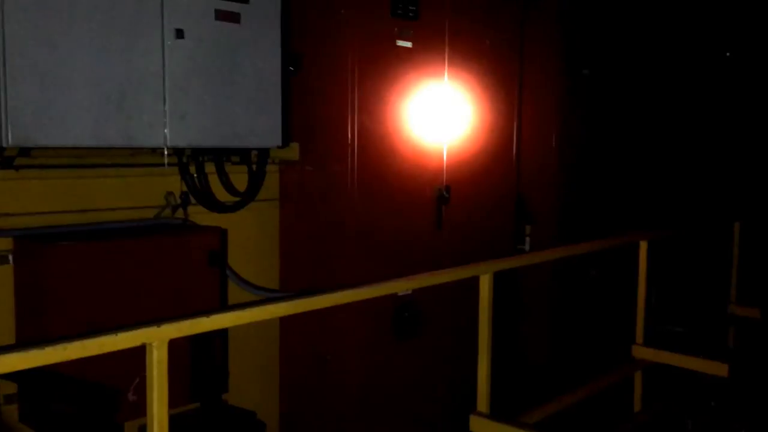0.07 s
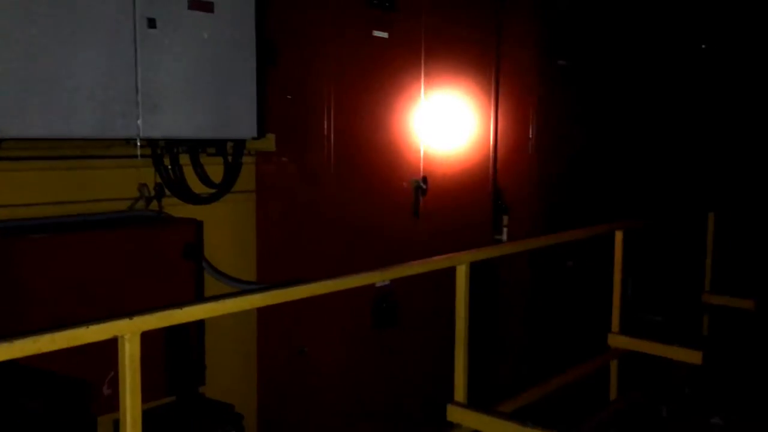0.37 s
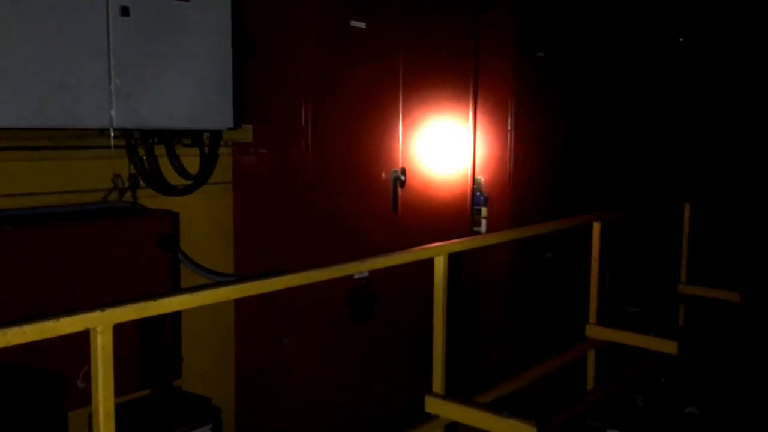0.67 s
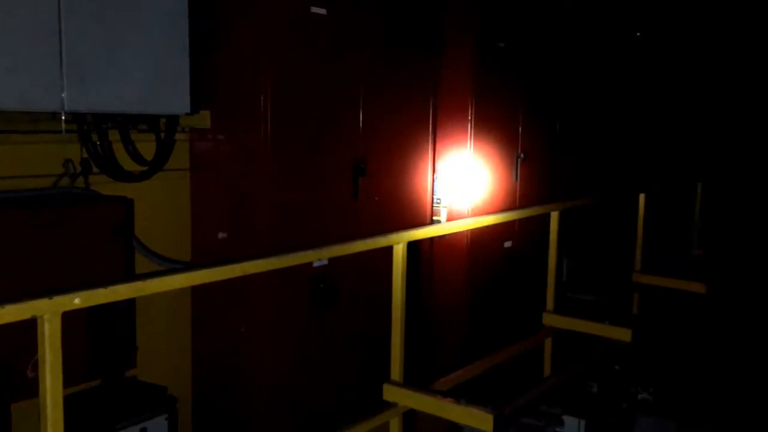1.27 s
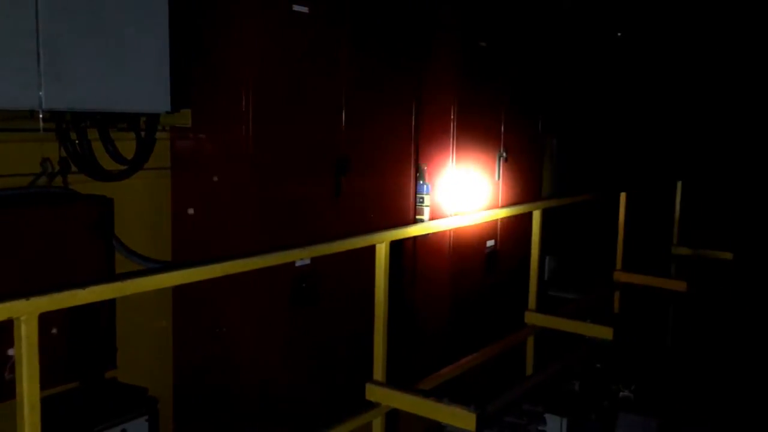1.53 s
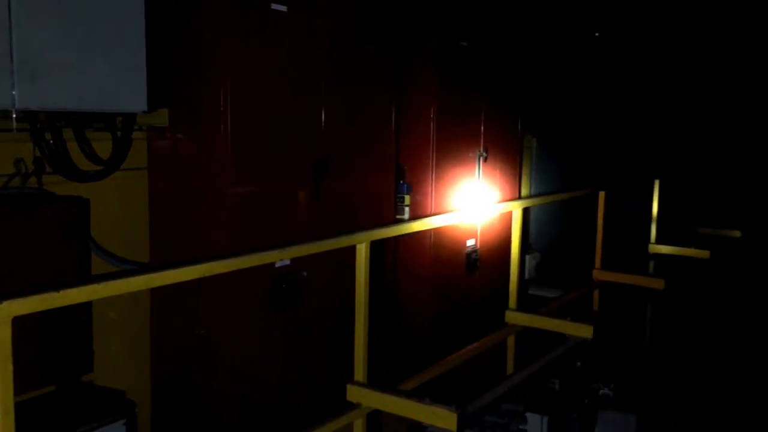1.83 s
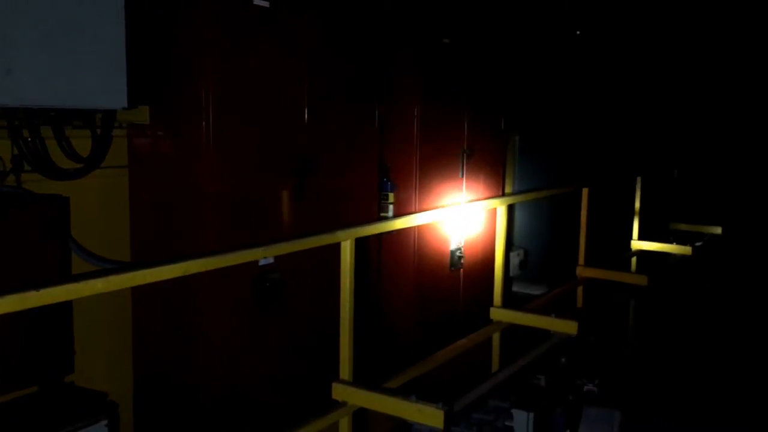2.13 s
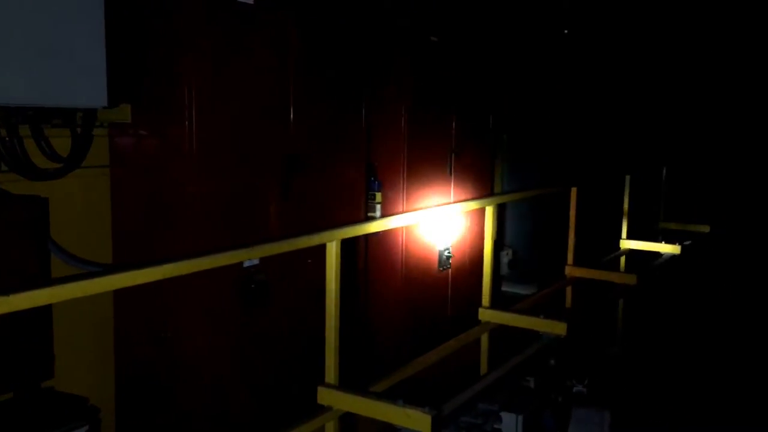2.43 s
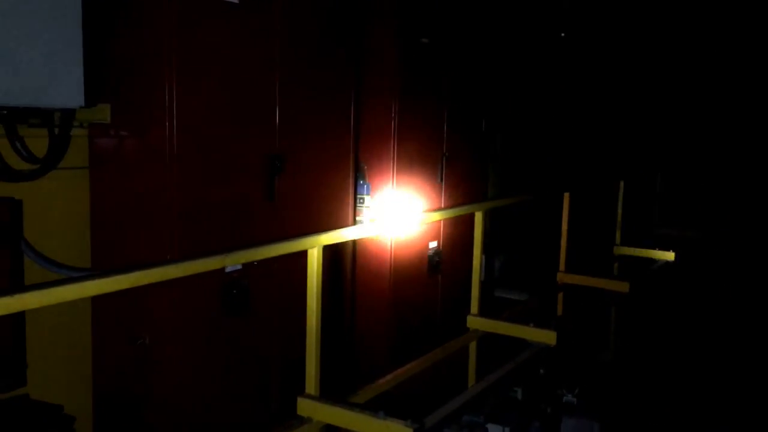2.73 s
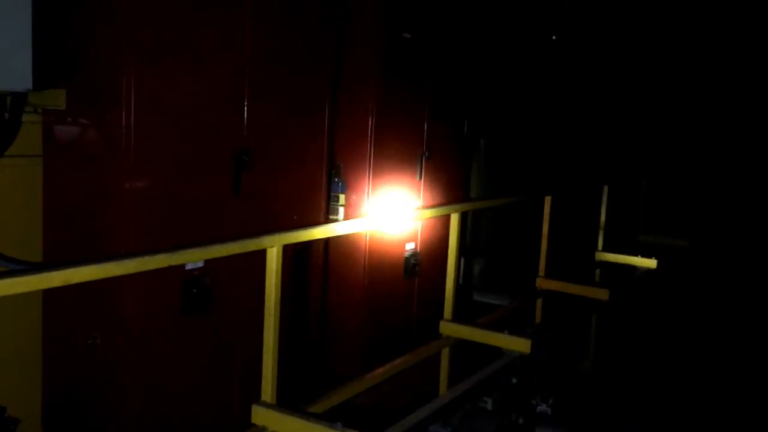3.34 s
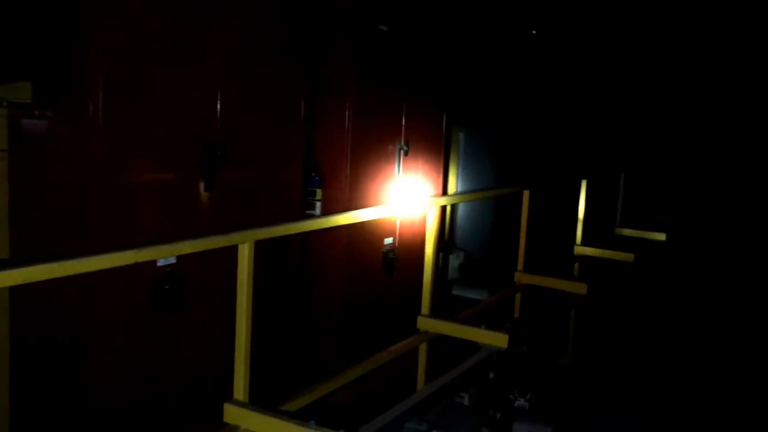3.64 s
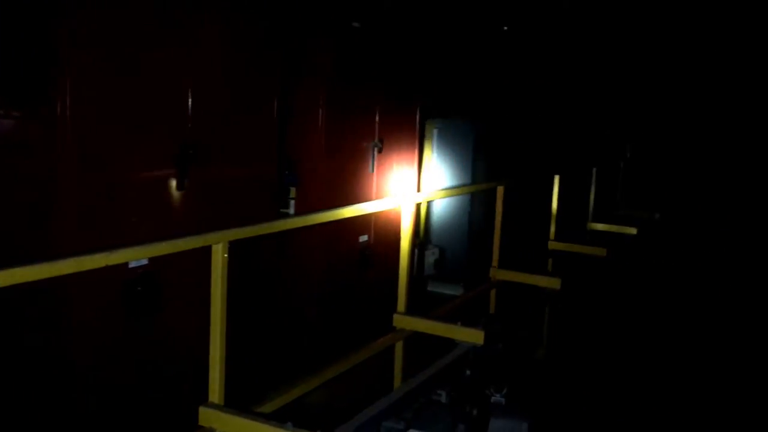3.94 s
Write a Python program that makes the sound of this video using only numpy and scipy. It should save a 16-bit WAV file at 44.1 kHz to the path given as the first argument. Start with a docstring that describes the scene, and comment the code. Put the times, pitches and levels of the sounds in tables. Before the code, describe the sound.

Distant machinery drones steadily in an industrial space, with a faint knock, scuff and click.

```python
"""Distant machines hum in a large industrial hall, heard while moving slowly along a walkway.
Their low tones beat against each other over a rumble, rushing ducts, a thin whine and a steady hiss.
Close by, friction makes noise: clothing rustles and rubs, and a shoe scuffs on grit.
Something knocks softly and a small metal catch clicks; both ring in damped modes that the walls prolong."""
import sys
import numpy as np
from scipy import signal
from scipy.fft import rfft, irfft
from scipy.io import wavfile
from scipy.ndimage import uniform_filter1d

SR = 44100
rng = np.random.default_rng(int(sys.argv[2]) if len(sys.argv) > 2 else 0)


def master(y):
    """Save y as 16-bit WAV."""
    cut = np.clip(np.atleast_2d(y).T, -1, 1)
    pcm = np.round(cut * 32767)  # scale
    wavfile.write(sys.argv[1], SR, pcm.astype(np.int16))


N = 176400
T = np.arange(N) / SR


def undb(db):
    """Amplitude ratio of a level in decibels."""
    return 10 ** (np.asarray(db) / 20)


def envelope(points):
    """Gain over time, linear in decibels between (s, dB) points."""
    return undb(np.interp(T, *np.array(points).T))


def wander(rate_hz):
    """Slow random modulation: steps smoothed twice, with a spread near 1."""
    hold = int(SR / rate_hz)
    steps = np.repeat(rng.standard_normal(N // hold + 1), hold)
    return 1.3 * uniform_filter1d(uniform_filter1d(steps, hold), hold)[:N]


def noise(spectrum, grain=0):
    """Noise shaped to (Hz, dB per Hz) points; grain makes its tiny impacts unequal."""
    white = rng.standard_normal(N)
    white *= np.exp(grain * np.repeat(rng.standard_normal(N // 16 + 1), 16)[:N])
    hz, db = np.array(spectrum).T
    bin_hz = np.maximum(np.arange(N // 2 + 1) * SR / N, 1)
    density = undb(np.interp(np.log(bin_hz), np.log(hz), db))
    skirt = np.minimum(bin_hz / hz[0], 1) * np.minimum(hz[-1] / bin_hz, 1)
    return irfft(rfft(white / white.std()) * density * skirt ** 2, N) * np.sqrt(SR / 2)


def edge(x, hz, kind, order=2):
    """Maximally flat low-pass or high-pass filter."""
    return signal.sosfilt(signal.butter(order, min(hz, SR / 2 - 1), kind, fs=SR, output="sos"), x)


def tone(hz, drift_hz, waver_db):
    """A sine near unit power under slow frequency and amplitude modulation."""
    turns = np.cumsum(hz + drift_hz * wander(2)) / SR + rng.random()
    return np.sqrt(2) * np.sin(2 * np.pi * turns) * undb(waver_db * wander(3.2))


def decay(age, t60):
    """Exponential damping: a fall of 60 dB in t60 seconds."""
    return np.exp(-np.log(1000) * age / t60)


def strike(blows, modes, crack_db):
    """Impact excitation: each blow makes a broadband crack and rings the object's damped modes."""
    out = np.zeros(N)
    for start, db in blows:
        age = np.maximum(T - start, 0)
        ring = sum(undb(gain) * np.sin(2 * np.pi * hz * age) * decay(age, t60) for hz, gain, t60 in modes)
        crack = undb(crack_db) * rng.standard_normal(N) * decay(age, t60=0.012)
        out += undb(db) * (T >= start) * (ring + crack)
    return out


def machines():
    """Superposed motor tones beat at their difference frequencies; hum and whine grow near the end."""
    # Each row: frequency in Hz, level in dB before the hum's gain.
    motor_tones = [(33.4, -74.5), (50.1, -62.5), (57.8, -67), (60.9, -51), (73.9, -64), (88.3, -68.5),
                   (100.2, -76), (133, -73.5)]
    # Each row: time in seconds, gain of the hum in dB.
    hum_gain = [(0, 0), (1, 1), (2.15, .5), (2.48, -2), (2.8, 0.3), (3.15, -0.5), (3.7, 2), (4, 2.5)]
    # Each row: time in seconds, level of the whine in dB.
    whine_level = [(0, -82.5), (.35, -81.5), (.8, -88), (1.2, -83.5), (1.9, -90.5), (2.15, -85),
                   (3.2, -84.5), (3.45, -78), (4, -75.5)]
    hum = sum(undb(db) * tone(hz, drift_hz=0.1, waver_db=0.76) for hz, db in motor_tones)
    whine = tone(hz=473.4, drift_hz=0.47, waver_db=-1)
    return hum * envelope(hum_gain) + whine * envelope(whine_level)


def air():
    """Broadband noises add in power: the hall's rumble, air rushing in ducts and an even hiss."""
    # Each row of the three spectra: frequency in Hz, density in dB per Hz.
    rumble_spectrum = [(18, -106), (25, -91.5), (32, -82), (42, -76.5), (62, -70.5), (80, -74.5),
                       (100, -80.5), (113, -83), (132, -80), (165, -89), (220, -99.5), (400, -110),
                       (900, -130)]
    duct_spectrum = [(100, -106), (185, -86.5), (215, -93), (255, -87), (290, -94.5), (335, -93.5),
                     (410, -101), (500, -108), (650, -107.5), (800, -113), (1200, -114), (2500, -130)]
    hiss_spectrum = [(300, -114), (1000, -112.5), (1500, -116), (2100, -116), (2750, -120), (3400, -118.5),
                     (5000, -121), (5700, -119), (7500, -121.5), (9800, -121.5), (10400, -126.5),
                     (11000, -122), (16000, -122)]
    # Each row: time in seconds, gain of the duct noise in dB.
    duct_gain = [(0, 2), (.4, -4.5), (.8, -1.5), (1.5, -3), (2.05, 2), (2.35, -1.5), (2.6, 3), (3.3, 0),
                 (4, -1.5)]
    rumble = noise(rumble_spectrum) * undb(0.6 * wander(7.6))
    ducts = noise(duct_spectrum) * envelope(duct_gain)
    return rumble + ducts + noise(hiss_spectrum)


def clothing():
    """Friction of moving cloth gives grainy noise that flickers in level."""
    # Each row: frequency in Hz, density in dB per Hz.
    cloth_spectrum = [(300, -120), (620, -111), (800, -117), (1150, -110), (1500, -114.5), (2000, -114),
                      (2800, -119.5), (3500, -115), (5000, -121), (6000, -118), (9000, -124), (16000, -128)]
    # Each row: time in seconds, gain in dB.
    cloth_gain = [(0, -20), (.7, -12), (1.1, -5), (1.5, -13.5), (1.85, -2), (2.3, 2.5), (2.42, -1),
                  (2.6, 2.5), (2.75, -2.5), (2.9, 1), (3.3, -2.5), (3.55, -2.5), (4, -8)]
    flicker = undb(1.7 * wander(24.8))
    return noise(cloth_spectrum, grain=0.34) * envelope(cloth_gain) * flicker


def ticks():
    """Bell-shaped pulses of high-passed noise, so brief that they are heard as faint ticks."""
    # Each entry: time of a peak in seconds.
    tick_times = [.293, .597, 2.094, 2.695, 3.294]
    level_db, width_s = -65.5, 0.0015
    pulses = sum(np.exp(-((T - at) / width_s) ** 2) for at in tick_times)
    return undb(level_db) * pulses * edge(rng.standard_normal(N), 11800, "high", order=4)


def rubs():
    """Faint friction noise swells and fades, each time through one narrow resonance."""
    # Each row: start and length in seconds, centre and bandwidth in Hz, level in dB.
    strokes = [(0.78, 0.55, 1580, 190, -84), (1.7, .56, 1170, 67, -89), (1.72, 0.42, 3370, 150, -90),
               (1.75, .19, 6200, 450, -83.5), (2.29, .1, 3700, 290, -80), (2.8, .2, 3000, 200, -87),
               (2.96, 0.15, 4120, 280, -83.5)]
    fade_s = 0.055
    out = np.zeros(N)
    for start, length, hz, width_hz, db in strokes:
        band = signal.lfilter(*signal.iirpeak(hz, hz / width_hz, fs=SR), rng.standard_normal(N))
        shape = np.clip(np.minimum(T - start, start + length - T) / fade_s, 0, 1)
        out += undb(db) * shape * band / band.std()
    return out


def knocks():
    """Soft blows set an object in free vibration; its strongest modes die quickly."""
    # Each row: start in seconds, level in dB.
    blows = [(1.093, -71.5), (2.2668, -66), (2.2745, -66), (2.2778, -62)]
    # Each row: frequency in Hz, gain in dB, 60 dB decay time in seconds.
    modes = [(730, -12, 0.0086), (908, -16, 0.18), (1050, 5, 0.019), (1230, 3, .015), (1430, -2, 0.016),
             (1920, -19, 0.18), (2245, -15, .16), (3600, -27, 0.13)]
    return strike(blows, modes, crack_db=-25)


def hall(x):
    """Reverberation: reflections from the steel walls add a diffuse, decaying tail."""
    tail = rng.standard_normal(N) * decay(T, t60=0.2)
    return x + undb(-7.5) * signal.fftconvolve(x, tail / np.linalg.norm(tail))[:N]


def squeak():
    """A nearly pure tone swells and fades as a thin squeak amid the rubbing."""
    # Each row: time in seconds, level in dB.
    squeak_level = [(1.6, -130), (1.82, -89), (2.1, -86), (2.3, -130)]
    return envelope(squeak_level) * tone(hz=2356, drift_hz=6, waver_db=0.9)


def scuffs():
    """Sliding friction of a sole on grit gives short bursts of band-limited noise."""
    # Each row: start and length in seconds, gain in dB, lower and upper band edge in Hz.
    slides = [(2.22, 0.045, -1.5, 2980, 8500), (2.279, 0.08, -2, 1290, 2560), (2.476, 0.07, 0.5, 300, 750),
              (2.484, 0.064, -0.5, 150, 17300), (2.487, 0.014, 0, 10900, 17200), (2.714, .02, 3, 500, 1150),
              (2.807, 0.022, 2.5, 1600, 2700)]
    # Each row: frequency in Hz, density in dB per Hz.
    sole_spectrum = [(200, -108), (600, -104), (1100, -105), (1400, -110), (1900, -105), (2800, -112),
                     (3600, -106), (5300, -112), (7800, -108), (10400, -115), (13000, -111), (16000, -112)]
    attack_s, release_s = 0.012, 0.022
    out = np.zeros(N)
    for start, length, db, low_hz, high_hz in slides:
        attack = np.clip((T - start) / attack_s, 0, 1)
        release = np.exp(-np.maximum(T - start - length, 0) / release_s)
        grit = edge(noise(sole_spectrum, grain=0.29), low_hz, "high")
        out += undb(db) * attack * release * edge(grit, high_hz, "low", order=4)
    return out


def metal_catch():
    """A small catch strikes and bounces; each contact excites its high modes."""
    # Each row: start in seconds, level in dB.
    contacts = [(3.7992, -57.5), (3.8022, -60), (3.8088, -62)]
    # Each row: frequency in Hz, gain in dB, 60 dB decay time in seconds.
    modes = [(1530, -15, 0.053), (2442, -16, 0.13), (2930, -14, .01), (3470, -8, .01), (3820, -5, 0.02),
             (3840, -12, 0.034), (4600, -8, .009), (5170, -10, 0.012), (6060, -12, .014), (13700, -15, .01)]
    return strike(contacts, modes, crack_db=-7)


def scene():
    """Superposition of the steady background and the small sounds; only the impacts reverberate."""
    steady = machines() + air()
    impacts = knocks() + metal_catch()
    return (steady + clothing() + scuffs() + rubs() + squeak() + ticks() + hall(impacts))[None]


def record(dry):
    """Band limiting: a steep low-pass removes the highest treble."""
    cutoff_hz = 15800
    return signal.sosfilt(signal.ellip(10, .1, 70, cutoff_hz, fs=SR, output="sos"), dry)


dry = scene()
out = record(dry)
master(out)
```